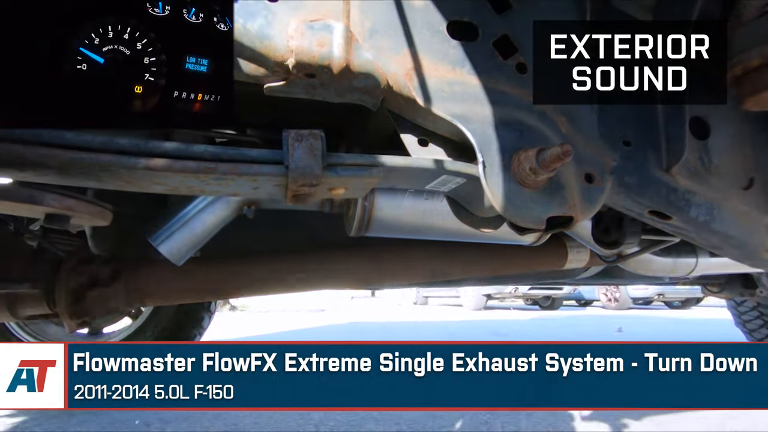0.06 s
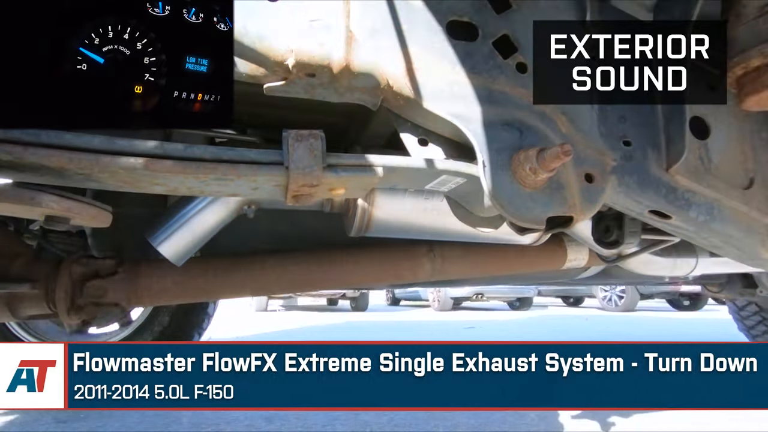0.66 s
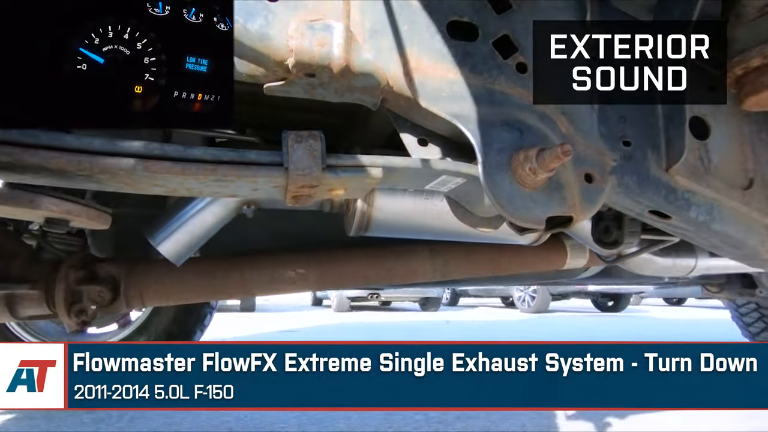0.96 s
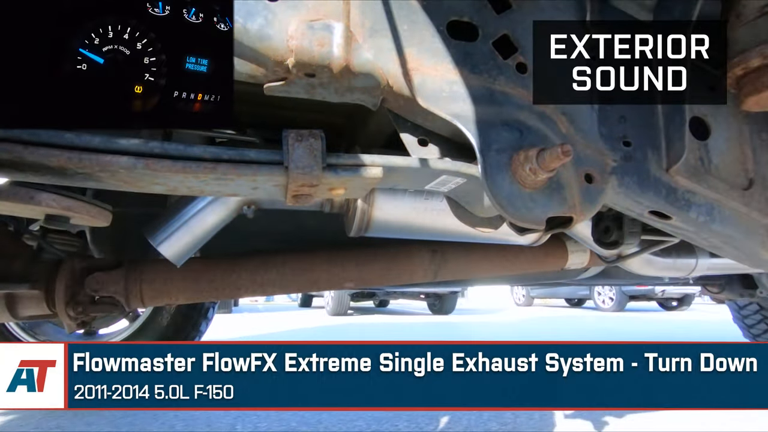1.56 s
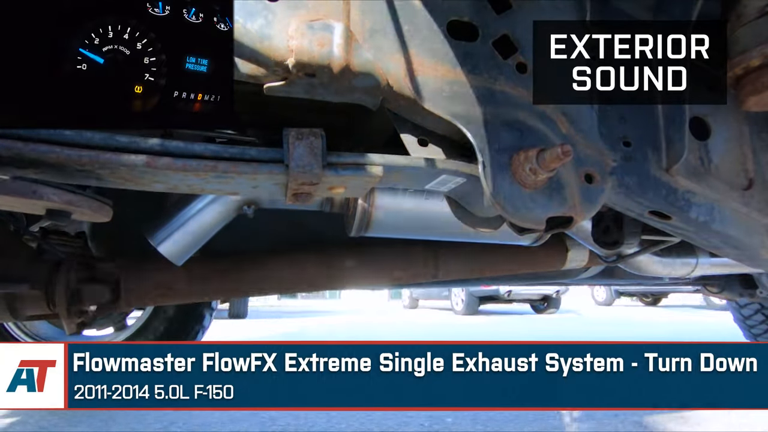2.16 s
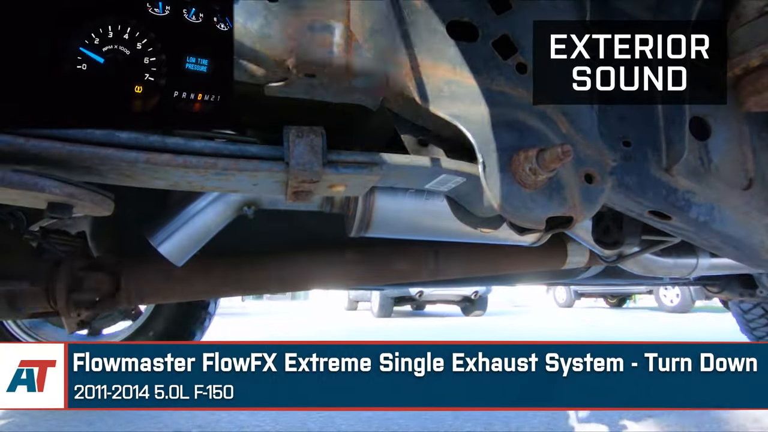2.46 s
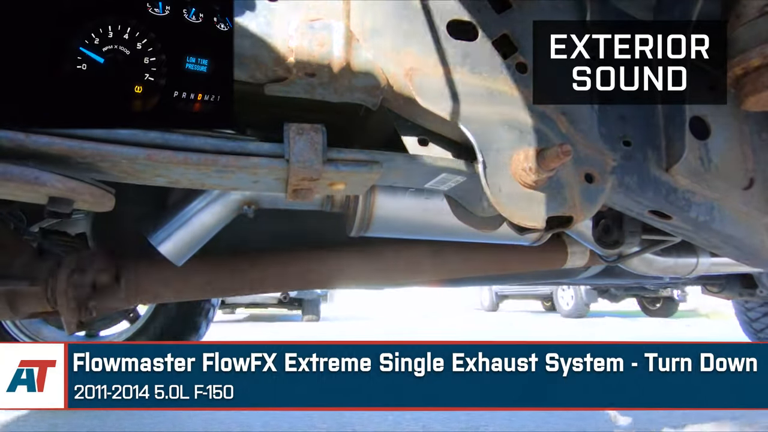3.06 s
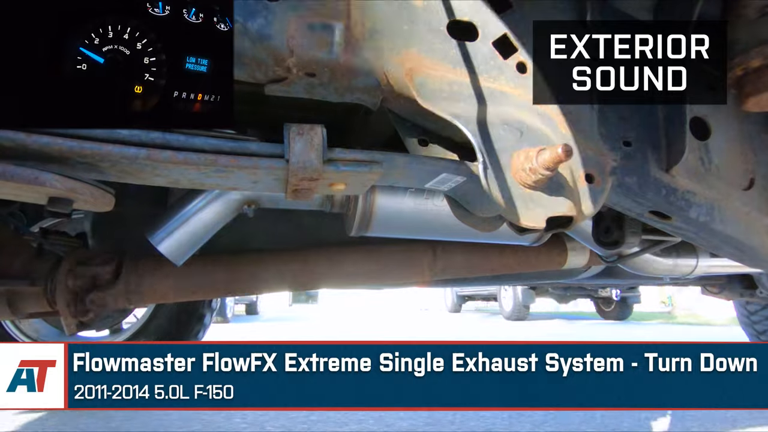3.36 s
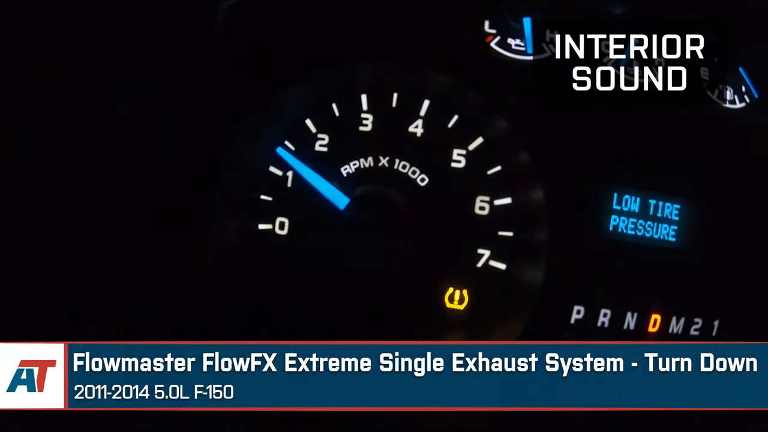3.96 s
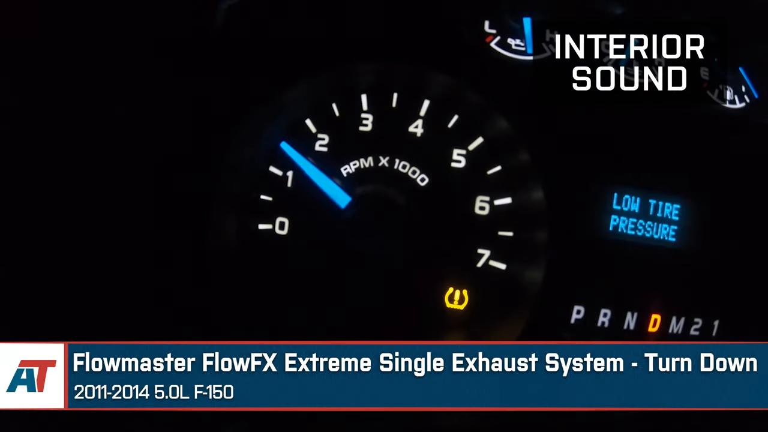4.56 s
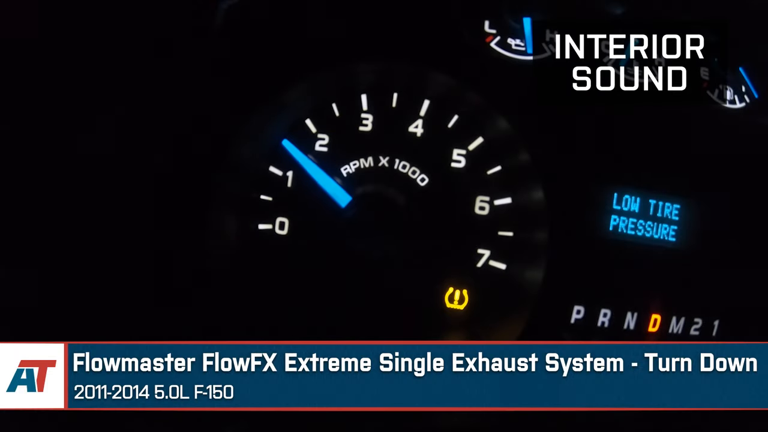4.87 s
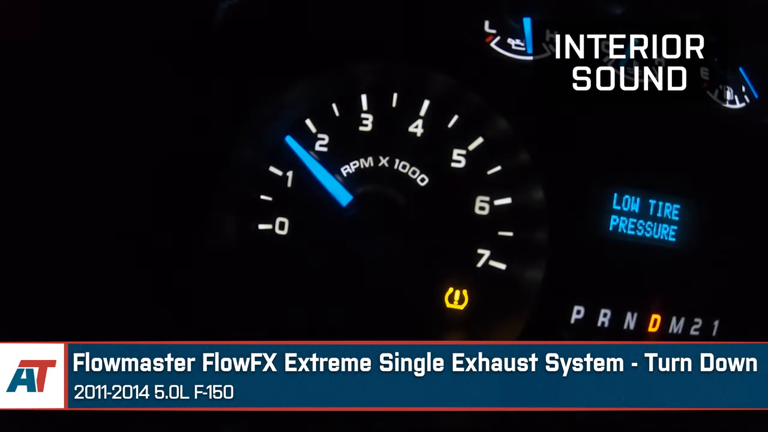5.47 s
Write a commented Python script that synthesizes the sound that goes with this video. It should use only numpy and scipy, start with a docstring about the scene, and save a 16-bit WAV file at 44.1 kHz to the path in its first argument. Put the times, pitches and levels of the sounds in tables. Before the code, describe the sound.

From the start, a V8 pickup runs at a fast idle, heard from underneath, close to the tailpipe. The exhaust is a low, lumpy, throbbing burble with rushing gas and a faint hiss. A few light ticks come in the first two seconds. The revs sag slightly toward 1.9 seconds and recover by 2.5, and a small tap follows at 3.3.

Between about 3.7 and 4.2 seconds the sound crossfades to the inside of the closed cab, where the engine is a louder, deep drone over a muffled growl. Its pitch climbs gently until the end at about 5.5 seconds, with the body booming most around 4.4. A plastic panel knocks softly at 4.1. Loose metal jingles faintly from 4.3 to 4.7, cloth rustles quietly until about 5.2, and several light trim knocks fall between 4.8 and 5.4.

```python
"""A lumpy burble with rushing gas and a few light ticks: a V8 pickup creeps along at a fast idle,
heard from underneath, beside its tailpipe. The two rows (banks) of cylinders take uneven turns
to fire, and each firing pushes out a puff of gas. The sound then fades over to the closed cab,
where the revs climb, the body booms, trim knocks, loose metal jingles and cloth rustles softly."""
import sys
import numpy as np
from scipy import signal
from scipy.fft import rfft, irfft, next_fast_len
from scipy.io import wavfile

SR = 44100
rng = np.random.default_rng(int(sys.argv[2]) if len(sys.argv) > 2 else 0)


def generate_wav(sig):
    """Save sig (samples, or channels by samples) to the path in sys.argv[1] as 16-bit PCM at SR."""
    pcm = np.round(np.clip(np.atleast_2d(sig).T, -1, 1) * 32767).astype(np.int16)
    wavfile.write(sys.argv[1], SR, pcm)


N = 243431

# the bank that each of the eight firings in an engine cycle leaves by: 1 near, 0 far
NEAR_BANK = [1, 0, 0, 1, 0, 1, 1, 0]
# engine speed heard in the cab: t/s, speed/rpm
RPM_CAB = [(3.72, 1375), (3.92, 1439), (4.17, 1457), (4.47, 1528), (5.18, 1641), (5.5, 1666)]
# pitches at which the cab's air rings: f/Hz, width/Hz, boost of a tone/dB, level in the growl/dB
CAB_MODES = [(226, 8.6, 25, -13), (472, 16, 7.5, -4.5)]

IDLE_RPM, BOOM_RPM, BOOM_WIDTH_RPM = 1060, 1505, 53
# Below, "revs" is the speed above idle (in the cab: above BOOM_RPM), in hundreds of rpm.
# A tone's "order" is how many times it vibrates in one engine cycle.


def tailpipe_note(cycles, revs, t):
    """The firing tone beats against its neighbours: a V8's lope. It takes over when the engine pulls."""
    # strong tones: order, level/dB, change/dB per 100 rpm, change/dB per s, change at full pull/dB
    lope_tones = [(8, -36.2, 0.5, -0.1, 4.3), (7, -38.3, 0.5, -0.9, -1.3), (5, -43.5, 10, 0.6, 2)]
    # overtones: order, relative level/dB, change at full pull/dB
    overtones = [(3, -12, -1), (4, -24, 5), (6, -26, 13), (9, -17, 6), (10, -25, 1), (11, -14, 5),
                 (13, -12, 0.5), (14, -21, 1.5), (15, -17, 2), (16, -8.5, 1), (17, -24, 4), (18, -36, 13),
                 (19, -22, 4), (20, -25, 5), (21, -21, 4), (22, -35, 13), (24, -21, 2), (26, -31, 2),
                 (29, -32, 3), (33, -27, -3), (35, -31, -4), (37, -36, 9)]
    pull = np.clip(revs / .4, 0, 1) ** 2  # full from 40 rpm above idle
    lope = edge = 0
    for order, db, revs_db, settle_db, pull_db in lope_tones:
        gain = from_db(db + revs_db * revs + settle_db * t + pull_db * pull)
        lope += gain * engine_tone(cycles, order, bank_lag=.092, waver_db=1.4)
    overtone_db = -32.5 + 2 * revs - 1.12 * t
    ahead = cycles + .58  # the overtones throb out of step with the lope
    for order, db, pull_db in overtones:
        gain = from_db(overtone_db + db + pull_db * pull)
        edge += gain * engine_tone(ahead, order, bank_lag=0, waver_db=1.2)
    return lope - edge


def cab_drone(cycles, revs, boom):
    """The cab booms on order 5; weaker tones swell as they climb through the pitches its air rings at."""
    # strong tones: order, level/dB, change/dB per 100 rpm, change at full boom/dB
    strong_tones = [(5, -24, 1.4, 6.5), (8, -29, 1, -10.5), (16, -37.5, 3, -1.5)]
    # weaker tones: order, relative level/dB
    weak_tones = [(3, -13), (4, -9), (6, -17), (7, -9), (9, -8), (10, -17), (11, -16), (13, -10.5),
                  (14, -12), (15, -17.5), (17, -34), (18, -29), (19, -23), (23, -29), (29, -30), (30, -28),
                  (32, -24.5), (34, -28), (35, -28), (37, -31), (38, -28), (39, -26)]
    cycle_hz = np.gradient(cycles) * SR
    drone = np.zeros(N)
    for order, db, revs_db, boom_db in strong_tones:
        gain = from_db(db + revs_db * revs + boom_db * boom)
        drone += gain * engine_tone(cycles, order, bank_lag=.024, waver_db=.6)
    for order, db in weak_tones:
        boost_db = sum(boost * nearness(order * cycle_hz, hz, width) for hz, width, boost, _ in CAB_MODES)
        gain = from_db(-38 + 2.5 * revs + db + boost_db)
        drone += gain * engine_tone(cycles, order, bank_lag=.024, waver_db=1.6)
    return drone


def cab_growl(cycles, revs, boom):
    """Muffled exhaust and road noise come through the floor and ring in the cab's air."""
    # tone colour of the growl: f/Hz, relative level/dB
    spectrum = [(12, -16), (30, -4), (52, -1.5), (85, -7.5), (140, -14), (190, -14), (230, -20.5),
                (290, -18), (350, -25.5), (440, -24.3), (540, -25.5), (660, -33), (850, -38.3),
                (1300, -40.3), (2500, -50.5), (6000, -66.5)]
    clicks = firings(cycles, offset=.536, far_bank_db=-8.5, uneven_db=5)
    growl = coloured(puffs(clicks, decay_s=.0044, depth=.08), spectrum)
    ringing = sum(from_db(db) * resonance(growl, hz, width) for hz, width, _, db in CAB_MODES)
    return from_db(-35.5 - .5 * revs - boom) * rms_one(growl + ringing)


def pipe_flutter(clicks):
    """No two firings are alike, so a low flutter comes out of the pipe."""
    # what the muffler and pipe let through: f/Hz, relative level/dB
    muffler = [(10, -13), (27, 0), (45, -4), (62, -7), (85, -3), (135, -16.5), (165, -11.5), (190, -3),
               (235, -18.5), (400, -48.5), (900, -62.5)]
    return from_db(-43.3) * coloured(puffs(clicks, decay_s=.007, depth=1), muffler)


def gas_rush(clicks, t):
    """Gas rushes out with each firing, rings in the hollows under the truck and slowly eases off."""
    # tone colour of the gas and engine clatter: f/Hz, relative level/dB
    spectrum = [(140, -21), (230, -1.5), (294, -3.5), (355, -4.5), (420, -2.5), (606, -2.5), (690, -6.5),
                (810, -7), (865, -11.5), (930, -9.5), (1290, -14), (1870, -18), (3000, -25), (5020, -42.5),
                (8000, -43), (15500, -65)]
    # hollows under the body: f/Hz, width/Hz, relative level/dB
    hollows = [(402, 20.5, 2), (533, 27, -16), (746, 62, -8), (987, 81, 1.5), (1252, 43, 1.5),
               (1428, 214, 1), (1875, 38, -2), (1900, 480, -1.5), (2080, 35, -6), (2215, 35, -4)]
    rush = coloured(puffs(clicks, decay_s=.0027, depth=.13), spectrum)
    ringing = sum(from_db(db) * resonance(rush, hz, width) for hz, width, db in hollows)
    return from_db(-47.5 - .63 * t) * rms_one(rush + ringing)


def bark(cycles, revs, t):
    """Once a cycle the strongest firing slaps the tailpipe: louder with the revs, softer over time."""
    # pitches at which the tailpipe rings: f/Hz, width/Hz, relative level/dB
    pipe_modes = [(283, 59, 4), (404, 63, -3.5)]
    at = np.flatnonzero(np.diff(np.floor(cycles - .7)))
    slaps = np.zeros(N)
    slaps[at] = from_db(1.5 * rng.standard_normal(len(at)))
    ringing = sum(from_db(db) * resonance(resonance(slaps + 1e-18, hz, width), hz, 4 * width)
                  for hz, width, db in pipe_modes)
    return from_db(-56 + 14 * revs - 3 * t) * rms_one(ringing)


def ticks():
    """Parts of the chassis and trim touch lightly, and at 3.27 s the exhaust gives one low pop; each is a short
    burst of ringing noise."""
    # touches, and one exhaust pop at 3.271 s: t/s, level/dB, f/Hz, width/Hz, rise/s, decay/s
    touches = [(.2745, -59, 10800, 1700, .0003, .002), (.471, -57.5, 7800, 5000, .007, .009),
               (.492, -56.5, 4350, 750, .003, .012), (.579, -58, 4000, 700, .002, .01),
               (.772, -60, 3900, 700, .002, .01), (1.342, -61, 4500, 1100, .002, .01),
               (1.731, -52.5, 4600, 800, .006, .01), (3.271, -42, 600, 160, .001, .008),
               (4.097, -49.5, 1450, 900, .001, .006), (4.144, -62, 8800, 2200, .001, .003),
               (4.176, -61, 9500, 2500, .001, .004), (4.204, -63, 6500, 3000, .001, .004),
               (4.398, -63, 3700, 2000, .003, .012), (4.561, -61, 4600, 2000, .002, .007),
               (4.655, -63, 3500, 2000, .003, .012), (4.829, -45.5, 660, 110, .001, .01),
               (4.88, -48.5, 1230, 200, .008, .035), (4.893, -44, 640, 120, .005, .026),
               (4.932, -49.5, 1200, 240, .004, .016), (4.943, -47, 680, 80, .006, .024),
               (5.256, -44.5, 660, 55, .007, .016), (5.385, -42, 660, 65, .002, .014)]
    out, grit = np.zeros(N), rng.standard_normal(N)
    for start_s, db, hz, width_hz, rise_s, decay_s in touches:
        shape = burst(start_s, rise_s, decay_s)
        ringing = resonance(resonance(grit, hz, 2 * width_hz), hz, 2 * width_hz)
        out += from_db(db) * np.sqrt(np.mean(shape ** 2)) * rms_one(shape * ringing)
    return out


def knock(t, start_s):
    """One soft blow sets a plastic panel ringing briefly."""
    # pitches of the panel: f/Hz, level/dB, decay/s
    panel_modes = [(950, -47.5, .005), (1240, -41.5, .008), (1640, -47, .005), (2050, -52.5, .007)]
    return sum(from_db(db) * burst(start_s, .001, decay_s) * np.sin(2 * np.pi * hz * (t - start_s))
               for hz, db, decay_s in panel_modes)


def jingle():
    """A small piece of loose metal chatters in short runs, always at the same pitches."""
    # pitches of the metal: f/Hz, width/Hz, relative level/dB
    metal_modes = [(2570, 90, -4), (2800, 50, 1), (4330, 70, 0), (4530, 70, 0), (5550, 70, -5),
                   (9250, 120, -6), (9900, 200, -6)]
    # touches: t/s, level/dB, decay/s
    touches = [(4.285, -71, .03), (4.372, -69, .03), (4.48, -71, .035), (4.559, -59.5, .02),
               (4.64, -69, .025), (4.7, -72, .02)]
    chatter = rng.standard_normal(N)
    ringing = rms_one(sum(from_db(db) * resonance(chatter, hz, width) for hz, width, db in metal_modes))
    return ringing * sum(from_db(db) * burst(start_s, .002, decay_s) for start_s, db, decay_s in touches)


def cloth_rustle(t):
    """Cloth brushes near by: a faint, grainy hiss that swells and fades with each stroke."""
    # tone colour of the cloth: f/Hz, relative level/dB
    spectrum = [(900, -7.5), (2500, 4), (4500, 2), (6000, 2), (8000, 1.5), (9800, 0.5), (11500, -5),
                (15500, -15)]
    # strokes: middle t/s, half length/s, level/dB
    strokes = [(4.192, .035, -62), (4.372, 0.06, -68), (4.574, 0.029, -65.5), (4.645, 0.016, -64.5),
               (4.785, .016, -63), (4.842, 0.038, -62.5), (4.897, 0.097, -62), (5.112, 0.12, -71)]
    fibres = rng.standard_normal(N) * from_db(1.2 * drift(150))
    stroke_power = sum(from_db(db) ** 2 * np.exp(-((t - middle_s) / half_s) ** 2)
                       for middle_s, half_s, db in strokes)
    return np.sqrt(from_db(-68) ** 2 + stroke_power) * coloured(fibres, spectrum)


def air_hiss(revs):
    """Air hisses smoothly from the engine bay, louder as the revs rise."""
    # tone colour of the hiss: f/Hz, relative level/dB
    spectrum = [(1500, -5), (3000, 3), (5200, -2), (8000, -12), (10500, -14), (15500, -19)]
    return from_db(-66.5 + 2.5 * revs) * coloured(rng.standard_normal(N), spectrum)


def engine_cycles(rpm, start):
    """Running count of engine cycles: one for every two turns of the crankshaft."""
    return start + np.cumsum(rpm) / (2 * 60 * SR)


def engine_tone(cycles, order, bank_lag, waver_db):
    """One wavering exhaust tone; a longer pipe delays the far bank's pulses by bank_lag cycles."""
    far = 1 - np.array(NEAR_BANK)
    arrival = np.arange(len(far)) / len(far) + bank_lag * far
    phase = np.angle(np.sum(.9 ** far * np.exp(-2j * np.pi * order * arrival)))
    return np.sqrt(2) * from_db(waver_db * drift(7)) * np.sin(2 * np.pi * order * cycles + phase)


def firings(cycles, offset, far_bank_db, uneven_db):
    """One click for each firing; the two banks take uneven turns, which makes the burble."""
    count = np.floor((cycles + offset) * len(NEAR_BANK)).astype(int)
    at = np.flatnonzero(np.diff(count))
    far = 1 - np.array(NEAR_BANK)[count[at + 1] % len(NEAR_BANK)]
    clicks = np.zeros(N)
    clicks[at] = from_db(far_bank_db * far + uneven_db * rng.standard_normal(N)[at])
    return clicks


def puffs(clicks, decay_s, depth):
    """The noise of swirling gas, which swells with each firing and then falls back."""
    swell = rms_one(signal.lfilter([1], [1, -np.exp(-1 / (decay_s * SR))], clicks))
    return rng.standard_normal(N) * (1 + depth * swell)


def burst(start_s, rise_s, decay_s):
    """The loudness of one touch: it rises quickly and dies away."""
    age = np.maximum(np.arange(N) / SR - start_s, 0)
    return (1 - np.exp(-age / rise_s)) * np.exp(-np.minimum(age / decay_s, 20))


def coloured(x, spectrum):
    """Give x the tone colour of a table (f/Hz, level/dB), at an average level of 1."""
    size = 2 * next_fast_len(N)
    hz, level_db = np.transpose(spectrum)
    bins_hz = np.maximum(np.arange(size // 2 + 1) * SR / size, 1)
    response_db = np.interp(np.log(bins_hz), np.log(hz), level_db)
    cepstrum = irfft(np.log(from_db(response_db)))
    response = np.exp(rfft(2 * cepstrum[:size // 2], size))  # rings after a sound, never before
    return rms_one(irfft(rfft(x, size) * response)[:N])


def resonance(x, hz, width_hz):
    """Let x ring around one pitch; a smaller width rings longer."""
    r = np.exp(-np.pi * width_hz / SR)
    feedback = [1, -2 * r * np.cos(2 * np.pi * hz / SR), r * r]
    return signal.lfilter(np.array([1, 0, -1]) * (1 - r * r) / 2, feedback, x)


def drift(rate_hz):
    """A smooth random wobble of typical size 1, worked out every 40 samples."""
    r = np.exp(-80 * np.pi * rate_hz / SR)
    slow = signal.lfilter([1], [1, -2 * r, r * r], rng.standard_normal(N // 40 + 2002))[2000:]
    return np.interp(np.arange(N) / 40, np.arange(len(slow)), rms_one(slow))


def nearness(x, centre, width):
    """1 at the centre, falling to a half at one width away."""
    return 1 / (1 + ((x - centre) / width) ** 2)


def from_db(db):
    """Turn decibels into a number to multiply by."""
    return 10 ** (np.asarray(db) / 20)


def rms_one(x):
    """Scale to an average (root mean square) level of 1."""
    return x / np.sqrt(np.mean(x ** 2) + 1e-20)


def under_truck(t):
    """The exhaust and the engine's hiss at a fast idle."""
    # engine speed heard under the truck: t/s, speed/rpm
    speeds = [(0.0, 1072), (0.51, 1066), (1.86, 980), (1.97, 987), (2.45, 1096), (3.3, 1100), (3.53, 1031),
              (3.75, 1077)]
    rpm = np.interp(t, *np.transpose(speeds))
    cycles, revs = engine_cycles(rpm, start=.689), (rpm - IDLE_RPM) / 100
    clicks = firings(cycles, offset=.484, far_bank_db=-4, uneven_db=1)
    noise = pipe_flutter(clicks) + gas_rush(clicks, t) + air_hiss(revs)
    return tailpipe_note(cycles, revs, t) + bark(cycles, revs, t) + noise


def in_cab(t):
    """The engine climbs through the speed at which the cab's body booms, and cloth rustles."""
    rpm = np.interp(t, *np.transpose(RPM_CAB))
    cycles, revs = engine_cycles(rpm, start=.883), (rpm - BOOM_RPM) / 100
    boom = nearness(rpm, BOOM_RPM, BOOM_WIDTH_RPM)
    return cab_growl(cycles, revs, boom) + cloth_rustle(t) + cab_drone(cycles, revs, boom)


def scene():
    """Under the truck first; that fades out while the cab fades in."""
    t = np.arange(N) / SR
    outside = np.clip((4.17 - t) / .39, 0, 1)  # gone at 4.17 s
    inside = np.clip(1 - (4.03 - t) / .34, 0, 1)  # full at 4.03 s
    mix = outside * under_truck(t) + inside * in_cab(t) + ticks() + knock(t, start_s=4.098) + jingle()
    return mix[None, :]


def record(dry):
    """The microphone loses the deepest bass; the highest treble is cut steeply."""
    thinned = signal.sosfilt(signal.butter(2, 12, "high", fs=SR, output="sos"), dry)
    return signal.sosfilt(signal.ellip(12, .1, 90, 15700, fs=SR, output="sos"), thinned)


dry = scene()
out = record(dry)
generate_wav(out)
```